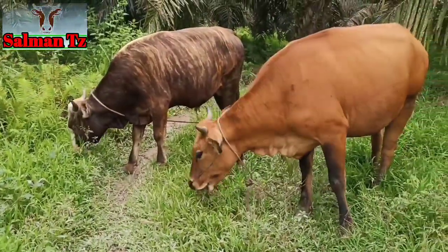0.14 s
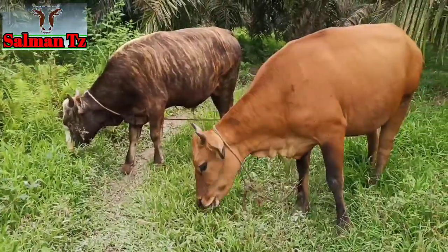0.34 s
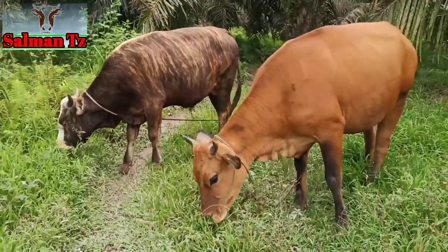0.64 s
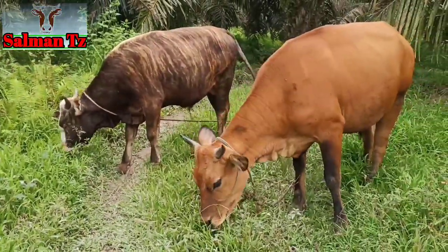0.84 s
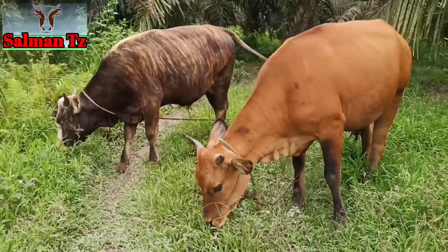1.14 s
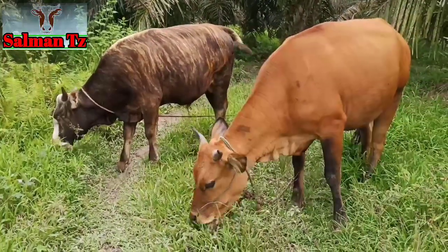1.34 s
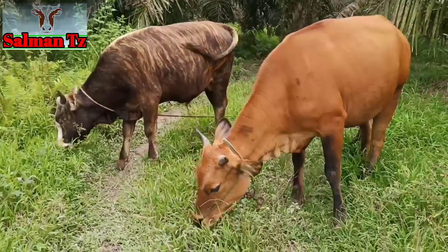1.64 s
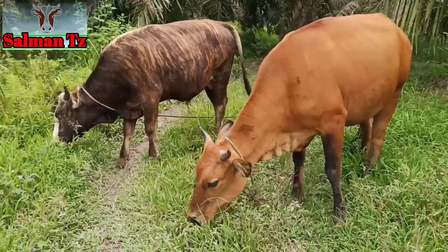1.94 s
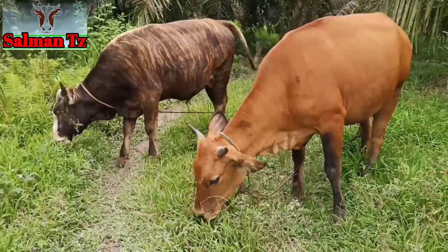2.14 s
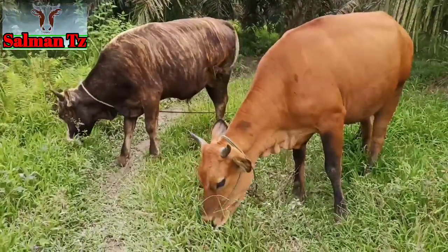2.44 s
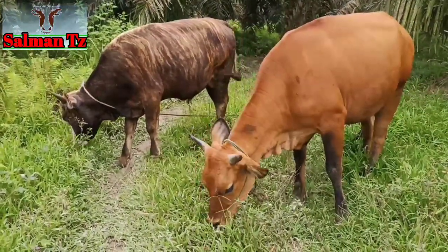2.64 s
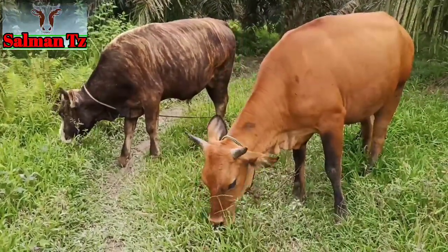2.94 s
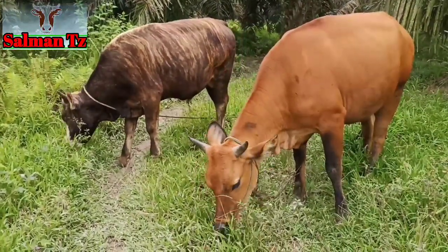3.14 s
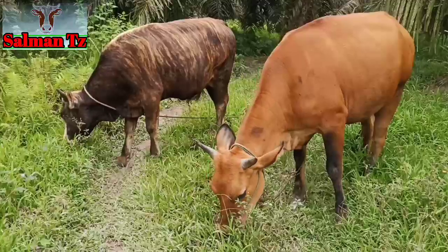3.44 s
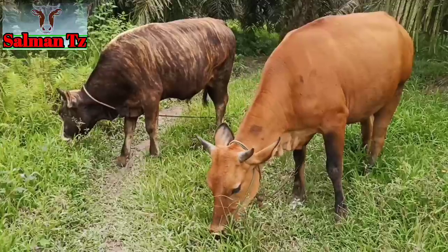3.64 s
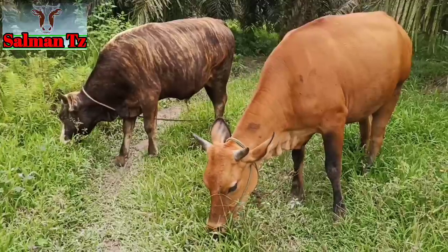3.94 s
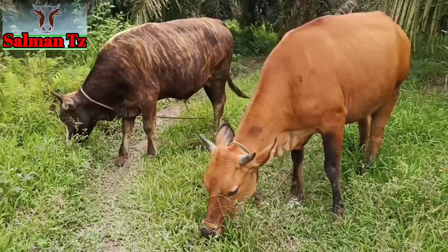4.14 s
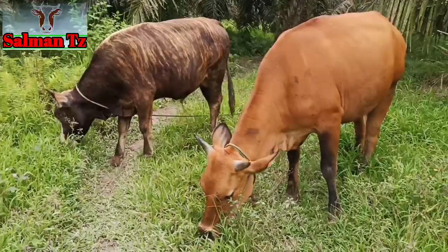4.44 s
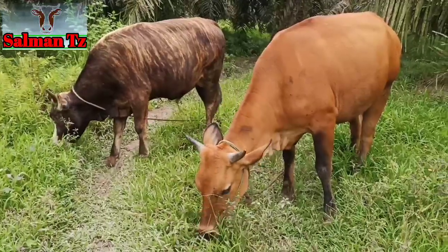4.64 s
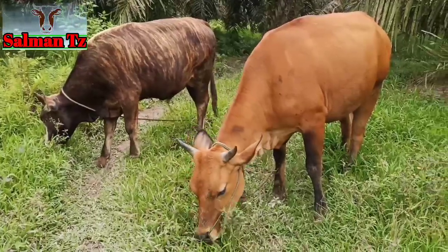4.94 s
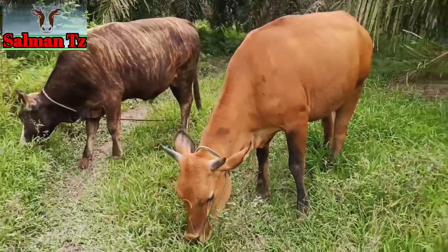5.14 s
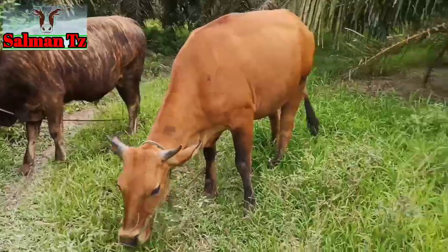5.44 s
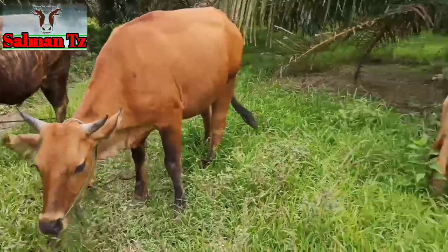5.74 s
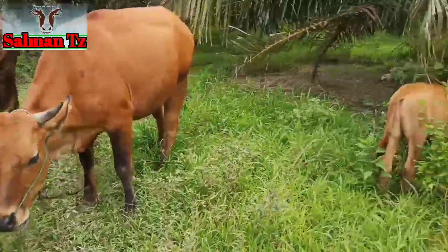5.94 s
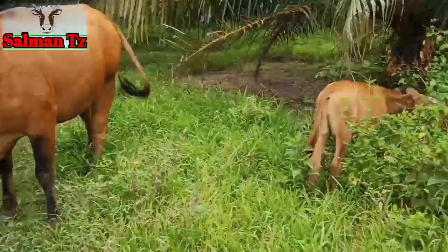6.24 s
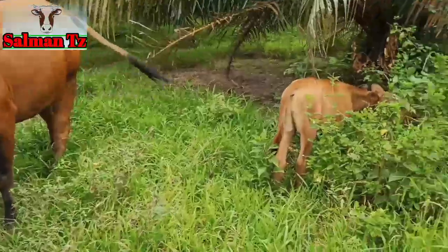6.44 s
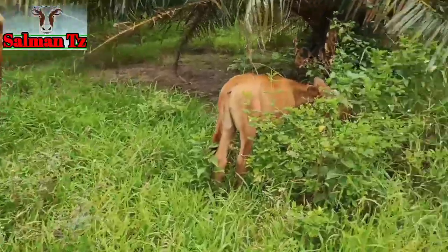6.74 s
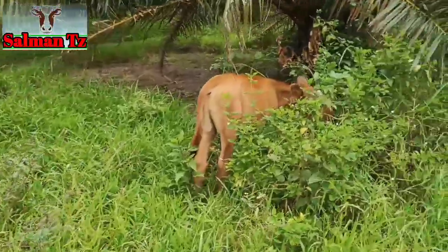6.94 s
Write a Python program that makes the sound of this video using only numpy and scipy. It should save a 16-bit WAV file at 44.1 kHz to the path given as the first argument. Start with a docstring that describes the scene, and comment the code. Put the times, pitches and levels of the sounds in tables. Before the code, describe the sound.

A tropical pasture, close to grazing cattle, the same in both channels. Crickets and katydids sing throughout: steady pulsed high tones, short chirping runs, double chirps and very high hiss, over a faint low rumble. Grass ticks and jaws grind softly. A small tear crackles at 0.2 s; from 0.5 to 1 s a distant bird gives a soft, slowing trill of gliding notes. Grass brushes at 1.6, a stem snaps at 2.1, and a tight cluster of snaps and tearing comes around 2.9-3.0, just as the bird calls again until 3.5. More bites crack at 3.6 and 3.75, a long brush at 4.3, strong snaps at 4.6-4.7, then 5.2 and 5.5. Faint far trills and whistles come and go. From 5.2 the microphone turns towards bushes: chewing recedes, a bush cricket and buzz come forward. At 6.8 a dull foot lands with a snap and dry rustle; insects continue to 7 s.

```python
"""Grass stretches, crackles and snaps as cattle graze close by in a tropical pasture; a muzzle brushes the sward
and jaws grind. Many small clicks make the tearing, and bursts ringing in stem and mouth make the snaps.
Crickets and katydids sing all round as pulsed tones and hiss, a bird gives two slowing trills of gliding notes
far off, thin trills and whistles sound farther away, and a foot comes down near the end, over a low rumble.
One microphone, which turns towards the bushes in the last two seconds."""
import sys
import numpy as np
from scipy import signal
from scipy.fft import rfft, irfft, next_fast_len
from scipy.io import wavfile

SR = 44100
rng = np.random.default_rng(int(sys.argv[2]) if len(sys.argv) > 2 else 0)


def to_wav(sig):
    """Store sig (one row per channel, or 1-D mono) as 16-bit WAV at the path in sys.argv[1].

    Samples outside -1..1 are clipped; the rate is SR.
    """
    pcm = np.clip(np.atleast_2d(sig), -1, 1) * 32767
    pcm = np.round(pcm).astype(np.int16)
    wavfile.write(sys.argv[1], SR, pcm.T)  # frames by channels


N = 312215
T = np.arange(N) / SR   # time in seconds


def from_db(db):
    """Logarithmic level: decibels to an amplitude gain."""
    return 10 ** (np.asarray(db) / 20)


def rms_one(x):
    """Normalisation: scale to unit mean power."""
    return x / np.sqrt(np.mean(np.abs(x) ** 2) + 1e-20)


def in_time(rows):
    """Linear interpolation: each column of a curve at every sample."""
    s, *columns = np.transpose(rows)
    return [np.interp(T, s, column) for column in columns]


def drift(rate_hz):
    """Low-passed noise: a slow random curve of spread 1, made at every 20th sample and interpolated."""
    r = np.exp(-40 * np.pi * rate_hz / SR)
    steps = rng.standard_normal(N // 20 + 4002)
    slow = signal.lfilter([1], [1, -2 * r, r * r], steps)[4000:]   # the filter has settled by then
    return np.interp(np.arange(N) / 20, np.arange(len(slow)), rms_one(slow))


def noise():
    """White noise: equal power at all frequencies."""
    return rng.standard_normal(N)


def coloured(x, spectrum):
    """Spectral shaping: weight a steady sound by frequency, then bring it to unit power."""
    hz, db = np.transpose(spectrum)
    size = next_fast_len(N)
    bins_hz = np.maximum(np.fft.rfftfreq(size, 1 / SR), 1)
    gain = from_db(np.interp(np.log(bins_hz), np.log(hz), db))
    return rms_one(irfft(rfft(x, size) * gain, size)[:N])


def resonate(x, modes):
    """Modal resonance: parallel two-pole resonators that keep the power of white noise."""
    out, power = 0, 0
    for k, (hz, width_hz, db) in enumerate(modes):
        r = np.exp(-np.pi * width_hz / SR)
        zeros = np.array([1, 0, -1]) * (1 - r * r) / 2
        poles = [1, -2 * r * np.cos(2 * np.pi * hz / SR), r * r]
        ringing = signal.lfilter(zeros, poles, x + 1e-18)
        out = out + (-1) ** k * from_db(db) * ringing   # alternate signs
        power += from_db(db) ** 2 * (1 - r * r) / 2
    return out / np.sqrt(power)


def swell(middle_s, length_s):
    """Gaussian envelope: a bell-shaped rise and fall, its length taken at half height."""
    bell = np.zeros(N)
    near = slice(*np.searchsorted(T, [middle_s - 2 * length_s, middle_s + 2 * length_s]))
    bell[near] = 2 ** -(2 * (T[near] - middle_s) / length_s) ** 2
    return bell


def grains(per_s, spread_db):
    """Random impulse train: clicks of very uneven size at chance times, with unit power."""
    sizes = from_db(spread_db * np.minimum(rng.exponential(1, N), 4))
    return rms_one((rng.random(N) < per_s / SR) * sizes * rng.choice([-1, 1], N))


def burst(decay_s, tail_db, tail_s, click):
    """Impulsive release: a click, a short puff of noise and a weaker tail, decaying exponentially."""
    t = T[:SR // 10]
    power = np.exp(-2 * t / decay_s) + from_db(tail_db) ** 2 * np.exp(-2 * t / tail_s)
    return click * (t == 0) + rng.standard_normal(len(t)) * np.sqrt(power)


def tone(hz):
    """Phase accumulation: a sine that follows a pitch curve."""
    return np.sin((2 * np.pi * (np.cumsum(hz) / SR % 1)).astype(np.float32))


def scattered(hz, width_hz):
    """Multipath scattering: a tone blurred into a narrow band by its many paths through the leaves."""
    phase = (2 * np.pi * (np.cumsum(hz + np.zeros(N)) / SR % 1)).astype(np.float32)
    return rms_one(drift(width_hz) * np.sin(phase) + drift(width_hz) * np.cos(phase))


def add(out, s, x):
    """Superposition: mix a short sound in at a time in seconds."""
    at = int(s * SR)
    out[at:at + len(x)] += x[:N - at]


def echoes(x, echo_db, t60=0.48):
    """Diffuse reverberation: leaves and trunks throw back a tail that falls 60 dB in t60 seconds."""
    t = T[:SR // 2]
    tail = rng.standard_normal(len(t)) * np.exp(-np.log(1000) * t / t60)
    return x + from_db(echo_db) * signal.fftconvolve(x, tail / np.linalg.norm(tail))[:N]


def turn(start_s=5.2, end_s=5.44):
    """Changing orientation: how far the microphone has swung towards the bushes, 0 to 1."""
    return np.interp(T, [start_s, end_s], [0, 1])


# Spectrum of the open country. Each row: frequency in Hz, relative level in dB.
AIR_SPECTRUM = [(25, -36), (45, -11), (80, -3), (160, 3), (240, -9), (310, -5), (450, -16.5), (800, -14.5),
                (1300, -26), (1600, -19), (2400, -28), (16000, -24.5)]
# Swells of the low rumble. Each row: middle in seconds, length in seconds, level in dB.
RUMBLE_SWELLS = [(.4, 0.49, -55.5), (2.99, 0.52, -51)]


def air(air_db=-52.0, waver_db=1.5, rumble_hz=160):
    """Broadband ambience: shaped noise wavers in level, and a narrow low band swells now and then."""
    swells = sum(from_db(db) * swell(s, length_s) for s, length_s, db in RUMBLE_SWELLS)
    steady = from_db(air_db + waver_db * drift(9.1)) * coloured(noise(), AIR_SPECTRUM)
    return steady + swells * scattered(rumble_hz, 29)


# Spectrum of countless far crickets. Each row: frequency in Hz, relative level in dB.
CHORUS_SPECTRUM = [(2500, -25), (2900, -13), (3800, -13), (4700, -6), (5500, -18.5), (6300, -9), (6700, 0),
                   (7000, -1.5), (7700, 5), (8600, -3), (9800, -17.5), (11000, -10), (12100, -34),
                   (15400, -5.5)]
# Steady pulsing cricket tones, some of them lingering echoes of nearer crickets. Each row: first pulse in
# seconds, pitch in Hz, width of the blurred part in Hz, pulses per second, pitch sweep over a pulse cycle in Hz,
# level in dB before the turn.
STEADY_TONES = [(0.028, 7110, 70, 14.2, -110, -60), (0.012, 7355, 32, 12.96, -150, -57),
                (0.024, 7625, 70, 14.92, -450, -51.5), (0.025, 7935, 30, 15.32, -100, -53.5)]


def cricket_chorus(far_db=-45.0, turned_db=-2.0, hiss_waver_db=0.6, waver_db=1.3):
    """Incoherent summation: steady tones pulse at their own rates, part blurred; far crickets merge into a hiss."""
    direct_share, echo_share = 0.78, 0.66
    out = from_db(far_db + hiss_waver_db * drift(0.99)) * coloured(noise(), CHORUS_SPECTRUM)
    for first_s, hz, width_hz, per_s, sweep_hz, db in STEADY_TONES:
        cycle = (per_s * (T - first_s) + 0.5 + 0.03 * drift(0.91)) % 1
        pitch = hz + sweep_hz * (cycle - 0.5) + 15 * drift(40)
        pulses = rms_one(np.sin(np.pi * cycle) ** 12 * tone(pitch))
        level = from_db(db + waver_db * drift(2.5) + turned_db * turn())
        out += level * (direct_share * pulses + echo_share * scattered(hz, width_hz))
    return out


# Level curve of the katydid's lisp. Each row: time in seconds, level in dB before pulsing.
LISP_LEVEL = [(0, -52.5), (3, -49.5), (5.3, -49.5), (6.2, -52.5), (7.08, -54)]


def katydids(buzz_db=-69, buzz_turned_db=8.5, buzz_depth=0.65):
    """Amplitude modulation: one lisps in very high pulsed noise, another buzzes a little lower in the bushes."""
    lisp_db, = in_time(LISP_LEVEL)
    spectrum = [(11500, -28), (12800, -10), (13500, -3.5), (15400, 0), (16000, -40)]   # Hz, dB
    lisp = from_db(lisp_db) * coloured(noise(), spectrum)
    pulses = 1 + 0.22 * tone(20.2 + 0.3 * drift(2))
    pulses += 0.25 * tone(40.4 + 0.6 * drift(2))
    pulses += 0.25 * tone(81.4 + drift(2))
    buzz = scattered(11140, 250) * (1 + buzz_depth * tone(132 + drift(1.5)))
    return lisp * pulses + from_db(buzz_db + buzz_turned_db * turn()) * buzz


# Far whistles. Each row: middle in seconds, length in seconds, pitch at the middle in Hz, glide in Hz per second,
# blur in Hz, level in dB.
FAR_WHISTLES = [(0.434, 0.14, 5270, -1, 100, -55), (4.034, 0.084, 2980, -100, 17, -61)]


def far_whistles():
    """Frequency glide: single sliding whistles, blurred by distance."""
    out = np.zeros(N)
    for s, length_s, hz, glide, blur_hz, db in FAR_WHISTLES:
        out += from_db(db) * swell(s, length_s) * scattered(hz + glide * (T - s), blur_hz)
    return out


# Far thin trills. Each row: middle in seconds, length in seconds, pitch in Hz, level in dB,
# echo share in dB.
FAR_TRILLS = [(.2, .32, 3410, -54.5, -7), (.11, .16, 2930, -58, -5), (2.63, .28, 3370, -58.5, -5),
              (4.05, .33, 3370, -57, -6), (4.2, .2, 2900, -62, -4), (6.577, .4, 3370, -57.5, -7)]


def far_trills(width_hz=55, fall_hz=240, notes_per_s=26.5):
    """Direct and scattered sound: thin trills of quick falling notes, with a smeared echo."""
    out = np.zeros(N)
    for s, length_s, hz, db, echo_db in FAR_TRILLS:
        cycle = (notes_per_s * (T - s) + 0.5) % 1
        notes = np.sin(np.pi * cycle) ** 4 * tone(hz - fall_hz * (cycle - 0.5))
        echo_share = from_db(echo_db)
        mixed = 2 * np.sqrt(1 - echo_share ** 2) * notes + echo_share * scattered(hz, width_hz)
        out += from_db(db) * swell(s, length_s) * mixed
    return out


# Level curve of the cricket in the bushes, heard as the microphone turns. Each row: time in seconds,
# level in dB before its echo is added.
BUSH_CRICKET_LEVEL = [(0, -63), (1.2, -58), (4.5, -59), (5.8, -53), (6.2, -49), (6.93, -49.5), (7.03, -68)]


def bush_cricket(pitch_hz=8260, scoop_hz=900, echo_db=-10, slap_db=-3.0, slap_delay_s=0.016):
    """Discrete reflection: chirps scoop up to pitch, come back once off the bushes and linger in the leaves."""
    level_db, = in_time(BUSH_CRICKET_LEVEL)
    cycle = (16.48 * (T - 0.034) + 0.5) % 1   # chirps per second, first chirp in seconds
    hz = pitch_hz - scoop_hz * np.maximum(0.5 - cycle, 0) + 18 * drift(47.0)
    direct = np.sin(np.pi * cycle) ** 12 * tone(hz)
    slap = np.interp(T - slap_delay_s, T, direct, left=0)
    chirping = rms_one(direct + from_db(slap_db) * slap)
    return from_db(level_db) * (chirping + from_db(echo_db) * scattered(pitch_hz, 45))


# Bouts of the trilling cricket. Each row: start in seconds, end in seconds.
TRILL_BOUTS = [(.05, 0.25), (.72, 1.22), (1.65, 2.3), (2.85, 3.53), (3.8, 4.62), (4.85, 6.6)]


def bout_cricket(pitch_hz=6810, width_hz=45, pulses_per_s=41.0, sweep_hz=-100,
                 level_db=-53.5, echo_db=0.0, edge_s=0.084):
    """Gated pulse train: a fast trill swells in, runs for a while and rests."""
    singing = np.zeros(N)
    for start_s, end_s in TRILL_BOUTS:
        singing += np.clip(np.minimum(T - start_s, end_s - T) / edge_s + 0.5, 0, 1)
    cycle = (pulses_per_s * T + 0.14 * drift(1.0)) % 1
    hz = pitch_hz + sweep_hz * (cycle - 0.5) + 25 * drift(3)
    pulses = rms_one(np.sin(np.pi * cycle) ** 4 * tone(hz))
    trill = rms_one(pulses + from_db(echo_db) * scattered(pitch_hz, width_hz))
    return from_db(level_db) * singing * trill


# Runs of double chirps. Each row: first chirp in seconds, second chirp in seconds, last chirp in seconds,
# number of chirps, level in dB when warm.
DOUBLE_CHIRP_RUNS = [(.349, .43, .531, 4, -49.5), (.758, .819, 1.274, 9, -49),
                     (2.281, 2.335, 2.444, 4, -49), (2.648, 2.648, 2.648, 1, -47),
                     (3.197, 3.244, 3.765, 12, -49), (3.992, 4.06, 4.06, 2, -48),
                     (4.358, 4.428, 5.243, 18, -47), (5.883, 5.965, 6.135, 5, -46),
                     (6.332, 6.389, 7.048, 15, -45.3)]


def chirps(cold_slower=0.2, pace_warms_chirps=6.5, pitch_warms_chirps=1.3):
    """Exponential warming: chirps of a run draw closer; gives time in seconds, coldness 0 to 1, level in dB."""
    rows = []
    for first_s, second_s, last_s, count, db in DOUBLE_CHIRP_RUNS:
        k = np.arange(round(count))
        steps = np.cumsum(1 + cold_slower * np.exp((1 - k[1:]) / pace_warms_chirps))
        later = np.interp(steps, steps[[0, -1]], [second_s, last_s]) if len(steps) else []
        coldness = np.exp(-k / pitch_warms_chirps)
        rows += [(s, cold, db) for s, cold in zip([first_s, *later], coldness)]
    return rows


def double_chirper(pitch_hz=4620, fall_hz=430, stroke_s=0.013, gap_s=0.015, cold_hz=190,
                   cold_db=-3.0, uneven_db=0.4, blur=0.45):
    """Stridulation: two falling wing strokes a chirp; each run starts low and soft and then warms up."""
    rows = chirps()
    level, hz = np.zeros(N), np.full(N, float(pitch_hz))
    u = np.linspace(0, 1, int(stroke_s * SR))   # progress through a stroke
    for (s, cold, db), chance in zip(rows, rng.standard_normal((len(rows), 3))):
        for k in range(2):
            start_s = s + (k - 0.5) * gap_s - stroke_s / 2
            gain = from_db(db + cold_db * cold + uneven_db * chance[k])
            add(level, start_s, gain * np.sin(np.pi * u))
            add(hz, start_s, 20 * chance[2] - cold_hz * cold - fall_hz * (u - 0.5))
    voice = np.sqrt(2) * tone(hz) + blur * scattered(hz, 210)
    return echoes(level * voice, echo_db=-9, t60=0.25)


# Short runs of the nearest cricket. Each row: first chirp in seconds, number of chirps.
NEAR_CRICKET_RUNS = [(0.018, 6), (.652, 8), (1.499, 7), (2.274, 9), (3.191, 9), (4.034, 8), (4.879, 7)]


def near_cricket(pitch_hz=7360, drop_hz=140, stroke_s=0.018, gap_s=0.013, level_db=-42,
                 second_db=-12.0, chirps_per_s=14.18):
    """Stridulation: each chirp is a firm wing stroke followed by a softer, lower one."""
    out, u = np.zeros(N), np.linspace(0, 1, int(stroke_s * SR))
    for first_s, count in NEAR_CRICKET_RUNS:
        for s in first_s + np.arange(round(count)) / chirps_per_s:
            for k in range(2):
                hz = pitch_hz - drop_hz * (k + (u - 0.5) / 2)
                stroke = np.sin(np.pi * u) ** 2 * tone(hz)
                start_s = max(s + k * gap_s - stroke_s / 2, 0)
                add(out, start_s, from_db(level_db + k * second_db) * stroke)
    return echoes(out, echo_db=-5)


# The bird's two slowing calls, note by note. Each row: start in seconds, length in seconds,
# pitch the arch rises towards in Hz, level in dB before the voice thins.
CALL_NOTES = [(0.472, 0.066, 1013, -44), (0.533, 0.033, 1200, -40), (0.583, .04, 1160, -41.5),
              (0.648, 0.04, 1150, -42), (0.736, .06, 1170, -41), (0.887, 0.11, 1195, -43.5),
              (2.953, .058, 1190, -43.5), (3.004, 0.053, 1190, -47.5), (3.056, 0.051, 1150, -46.5),
              (3.125, .048, 1130, -45.5), (3.214, .06, 1170, -45.5), (3.342, 0.12, 1180, -45.5)]


def bird(base_hz=935, leap_s=0.0186, leap_width_s=0.0022, crest_share=0.3, fall_share=0.98,
         break_hz=1070, thin_db=-5.5, top_db=-7.5, attack_s=0.018, release_s=0.0098,
         waver_hz=11, flutter_db=1.8):
    """Register break: each note swells low, breaks upwards into a thin voice, arches over and sinks, wavering."""
    out, waver, flutter = np.zeros(N), waver_hz * drift(90), flutter_db * drift(50)
    for s, length_s, top_hz, db in CALL_NOTES:
        t = T[:int(length_s * SR)]
        now = int(s * SR) + np.arange(len(t))
        u = np.maximum(t - leap_s, 0) / (length_s - leap_s)   # progress after the leap
        leap = 1 / (1 + np.exp((leap_s - t) / leap_width_s))
        arch = (1 - fall_share * ((u - crest_share) / (1 - crest_share)) ** 2) * leap
        hz = base_hz + (top_hz - base_hz) * arch
        broken = 1 / (1 + np.exp((break_hz - np.maximum.accumulate(hz)) / 20))   # stays broken
        gate = np.minimum(t / attack_s, 1) ** 2 * np.minimum((length_s - t) / release_s, 1)
        gain = from_db(db + flutter[now] + broken * (thin_db + top_db * arch))
        add(out, s, gain * gate * tone(hz + waver[now]) * np.sqrt(2))
    return echoes(out, echo_db=-11.5, t60=0.45)


# Dull bumps of feet and jaws. Each row: time in seconds, level in dB before the ground's resonance.
DULL_BUMPS = [(.427, -35.5), (2.068, -42), (2.916, -33), (4.429, -38.5), (4.664, -39), (5.491, -37),
              (5.51, -37), (6.776, -33.5), (6.786, -32), (6.807, -32)]
# Resonances of the ground. Each row: frequency in Hz, width in Hz, relative level in dB.
GROUND_MODES = [(184, 178, 2), (354, 98, 4), (520, 210, -8.5)]


def bumps(step_s=6.88, step_length_s=0.36, litter_db=-55):
    """Damped impact: soft weight lands on turf, and the last step presses down the dry litter."""
    pushes = np.zeros(N)
    for s, db in DULL_BUMPS:
        add(pushes, s, from_db(db) * burst(decay_s=0.0032, tail_db=-7, tail_s=0.015, click=7.6))
    dry_clicks = resonate(grains(3000, 2.8), [(1440, 1400, 0)])
    litter = from_db(litter_db) * swell(step_s, step_length_s) * dry_clicks
    dull = signal.butter(2, 1100, fs=SR, output="sos")
    return signal.sosfilt(dull, resonate(pushes, GROUND_MODES)) + litter


# Spectrum of crackling grass, shared with the tearing. Each row: frequency in Hz, relative level in dB.
CRACKLE_SPECTRUM = [(900, -15), (2300, -16), (3000, -3.5), (4200, 2), (5600, -2), (7800, 0), (11000, -4),
                    (15500, -7)]
# Spectrum of pulled roots, shared by jaws and tearing. Each row: frequency in Hz, relative level in dB.
PULL_SPECTRUM = [(60, -28), (160, 5.5), (300, 1), (700, -14), (1100, -21), (2200, -17), (4000, -57)]


def rustling(blades_db=-58, chew_db=-60, chew_swing_db=2.0, turned_db=-8.0):
    """Granular friction: blades brush and tick, and soft wet clicks come from the grinding jaws."""
    blades = from_db(blades_db + 1.5 * drift(5)) * coloured(grains(1500, 4.2), CRACKLE_SPECTRUM)
    chewing = from_db(chew_db + chew_swing_db * np.tanh(drift(3.0)))
    jaws = chewing * coloured(grains(170, 2.3), PULL_SPECTRUM)
    cheeks = signal.butter(2, 900, fs=SR, output="sos")   # the cheeks muffle the jaws
    return from_db(turned_db * turn()) * (blades + signal.sosfilt(cheeks, jaws))


# Thick stems that snap. Each row: time in seconds, then before the shared trims the stem level in dB,
# mouth knock in dB and treble in dB, and last the pitch of the mouth as a ratio.
STEM_SNAPS = [(2.065, -23.5, -43.5, -31, 1), (2.874, -21.5, -44, -34, 1), (2.923, -24.5, -46, -36, 0.86),
              (2.946, -18, -47, -31, 1), (2.979, -21.5, -48, -37, 1), (3.006, -23.5, -53.5, -31, 1),
              (3.546, -18.5, -49, -31, 0.96), (3.751, -21, -43.5, -42, 0.88), (4.629, -20, -38, -34, 0.96),
              (4.66, -16, -39, -37, 0.9), (4.672, -15.5, -40, -27, 0.95), (5.22, -18.5, -51, -35, 1),
              (5.449, -21.5, -34.5, -31, 1), (5.487, -15, -32, -28, 1), (5.506, -19, -34.5, -33, 1),
              (6.774, -21.5, -45.5, -34, 1)]
# Resonances of the muzzle. Each row: frequency in Hz, width in Hz, relative level in dB.
MUZZLE_MODES = [(210, 86, -6), (704, 138, 0), (1105, 350, -15), (1550, 155, -10.5)]
# Resonances of breaking stems. Each row: frequency in Hz, width in Hz, relative level in dB.
STEM_MODES = [(2760, 340, -9.5), (4070, 555, 6.5), (4770, 1920, -0.5), (7980, 1640, 0)]


def snapping(stem_db=-3.0, knock_db=5.0, treble_db=5.5, treble_hz=7000, stem_spread_octaves=0.025):
    """Fracture and cavity resonance: a stem cracks at its own pitch and knocks in the mouth's varying hollow."""
    out, bright = np.zeros(N), signal.butter(2, treble_hz, "high", fs=SR, output="sos")
    for s, peak, knock, treble, mouth_pitch in STEM_SNAPS:
        stem_pitch = 2 ** (rng.standard_normal() * stem_spread_octaves)
        stem_break = burst(decay_s=0.0017, tail_db=-14.5, tail_s=0.018, click=2.4)
        stem = resonate(stem_break, np.multiply(STEM_MODES, [stem_pitch, 1, 1]))
        mouth_break = burst(decay_s=0.0012, tail_db=-13, tail_s=0.015, click=8.7)
        mouth = resonate(mouth_break, np.multiply(MUZZLE_MODES, [mouth_pitch, 1, 1]))
        crack = signal.sosfilt(bright, burst(decay_s=0.0019, tail_db=-10, tail_s=0.0092, click=1.3))
        add(out, s, from_db(peak + stem_db) * stem)
        add(out, s, from_db(knock + knock_db) * mouth)
        add(out, s, from_db(treble + treble_db) * crack)
    return out


# Tufts torn off. Each row: time at its height in seconds, length in seconds, crackle in dB,
# dull pull of the roots in dB.
TUFT_TEARS = [(0.243, 0.042, -40.5, -58), (2.073, 0.03, -34.5, -44.5), (2.927, .1, -42, -51),
              (3.565, 0.032, -38, -47.5), (3.738, 0.028, -36.5, -55), (4.61, 0.054, -41.5, -45.5),
              (4.669, 0.018, -37, -44), (5.044, 0.052, -43.5, -63), (5.217, 0.034, -38.5, -44.5),
              (5.442, 0.01, -44, -59), (5.511, 0.063, -40, -54)]
# Sweeps of a muzzle or leg through the grass. Each row: time at its height in seconds, length in seconds,
# crackle in dB.
GRASS_BRUSHES = [(1.61, 0.24, -47), (2.493, 0.046, -45.5), (4.336, 0.4, -48.5), (6.843, 0.37, -47)]


def tearing(fibres_per_s=6500, spread_db=3.0, clump_db=3.5, settle_lag_s=0.014, settle_s=0.11,
            settle_db=-10, brush_pull_db=-11.5):
    """Crackling noise: many fibres give way while roots tug at the soil; sweeps through grass crackle softer."""
    strokes = list(TUFT_TEARS)
    for s, _, db, pull_db in TUFT_TEARS:   # after each tear the sward springs back
        strokes.append((s + settle_lag_s, settle_s, db + settle_db, pull_db + settle_db))
    for s, length_s, db in GRASS_BRUSHES:   # the softer crackles share one dull pull, set below their crackle
        strokes.append((s, length_s, db, db + brush_pull_db))
    crackle_power, pull_power = 0, 0
    for s, length_s, db, pull_db in strokes:
        power = swell(s, length_s) ** 2
        crackle_power = crackle_power + from_db(db) ** 2 * power
        pull_power = pull_power + from_db(pull_db) ** 2 * power
    clumps = rms_one(from_db(clump_db * np.tanh(drift(140))))   # fibres break in bundles
    crackle = np.sqrt(crackle_power) * coloured(grains(fibres_per_s, spread_db), CRACKLE_SPECTRUM)
    pull = np.sqrt(pull_power) * coloured(grains(1200, 1.5), PULL_SPECTRUM)
    return clumps * (crackle + pull)


def scene():
    """Superposition: everything reaches one microphone, the same in both channels."""
    insects = cricket_chorus() + katydids() + bush_cricket()
    insects += bout_cricket() + double_chirper() + near_cricket()
    far_calls = far_whistles() + far_trills() + bird()
    cattle = bumps() + rustling() + snapping() + tearing()
    return np.tile(air() + insects + far_calls + cattle, (2, 1))


def record(dry, cutoff_hz=15520):
    """Band limiting: a steep elliptic low-pass cuts the top."""
    return signal.sosfilt(signal.ellip(12, 0.2, 80, cutoff_hz, fs=SR, output="sos"), dry)


dry = scene()
out = record(dry)
to_wav(out)
```